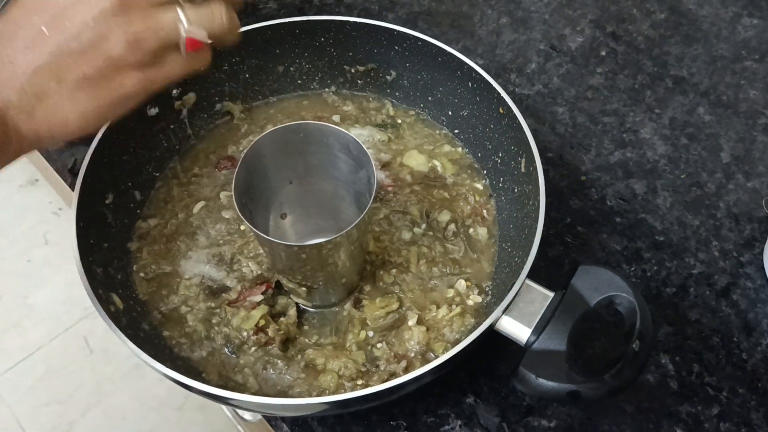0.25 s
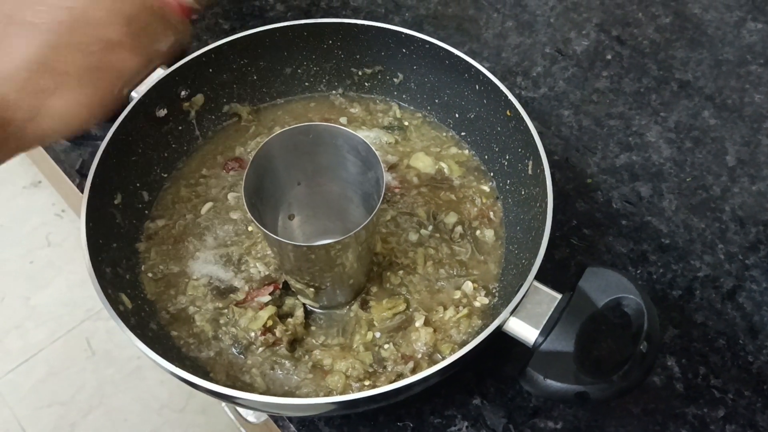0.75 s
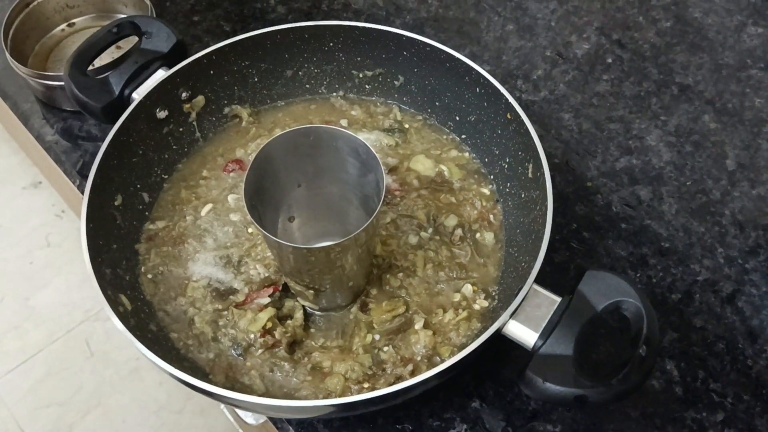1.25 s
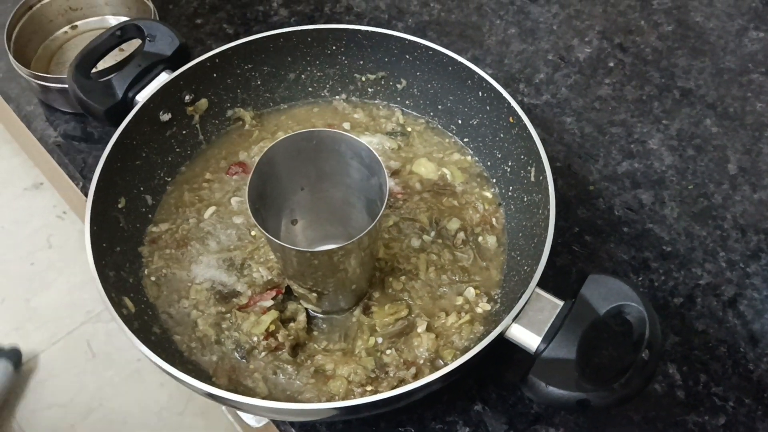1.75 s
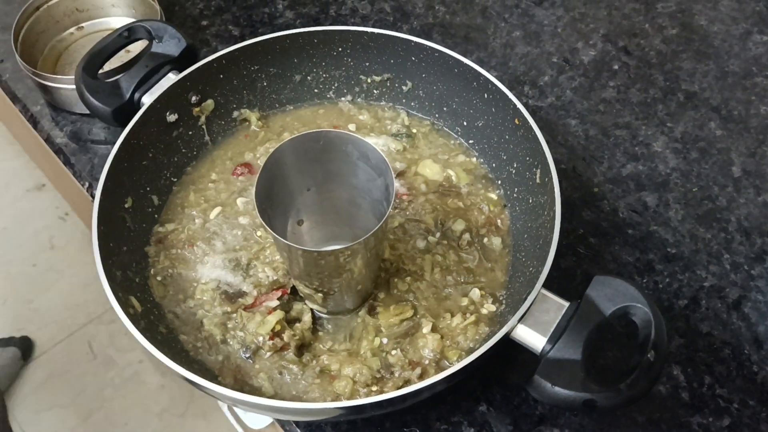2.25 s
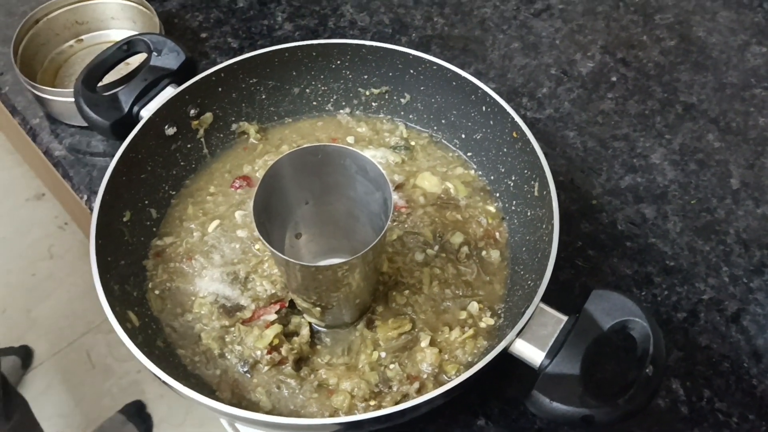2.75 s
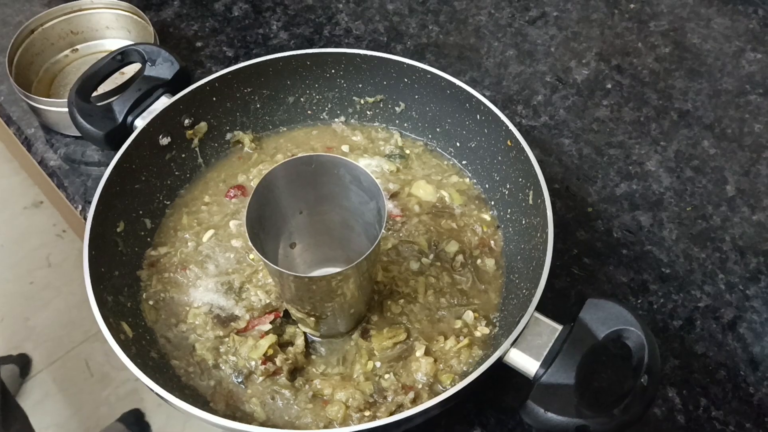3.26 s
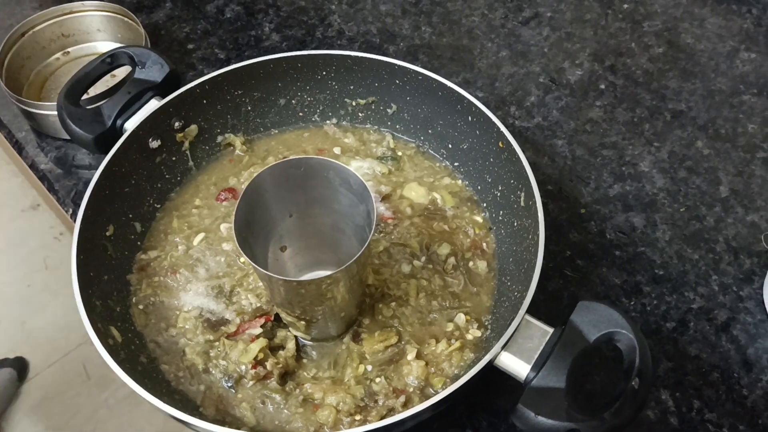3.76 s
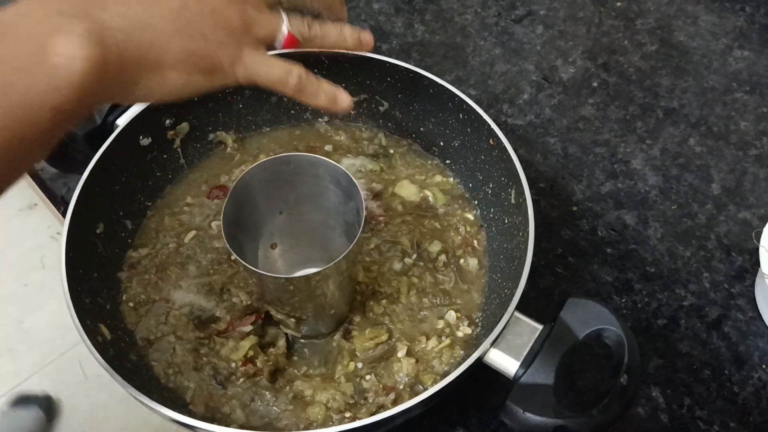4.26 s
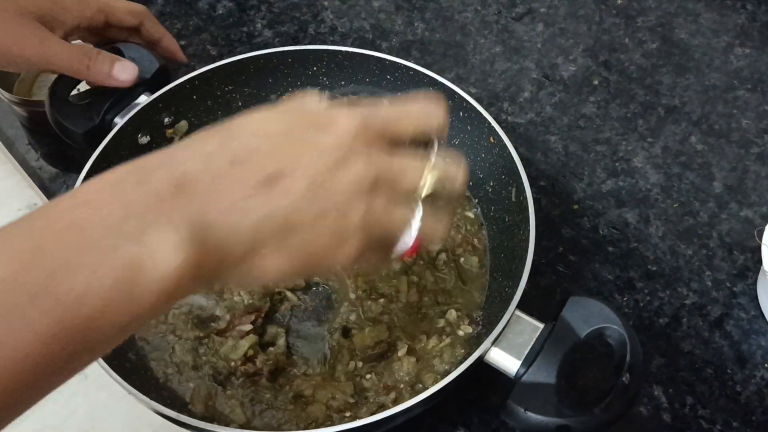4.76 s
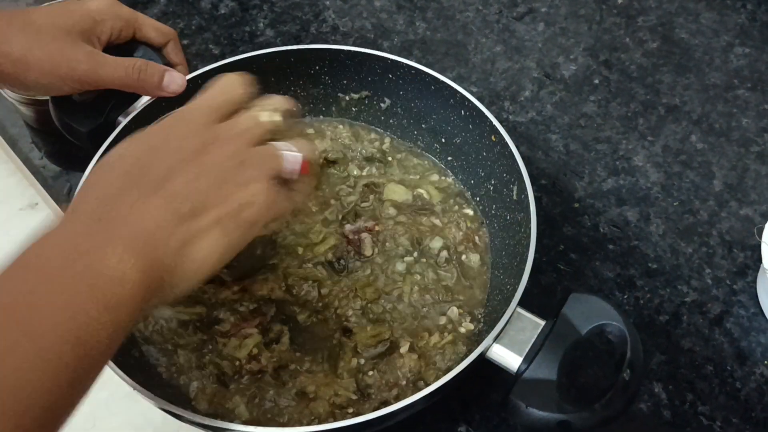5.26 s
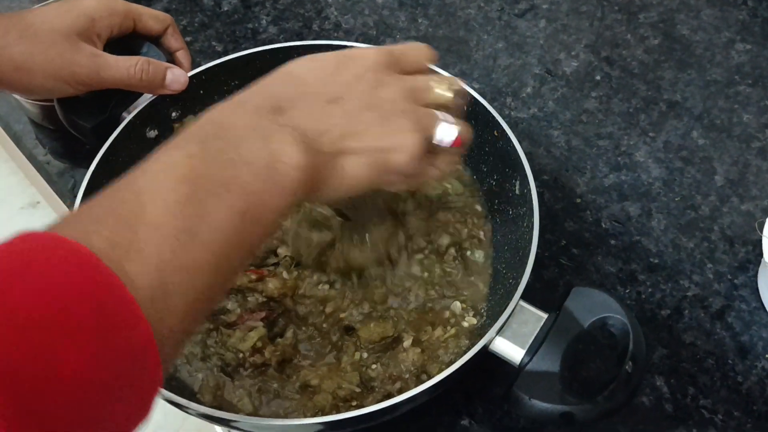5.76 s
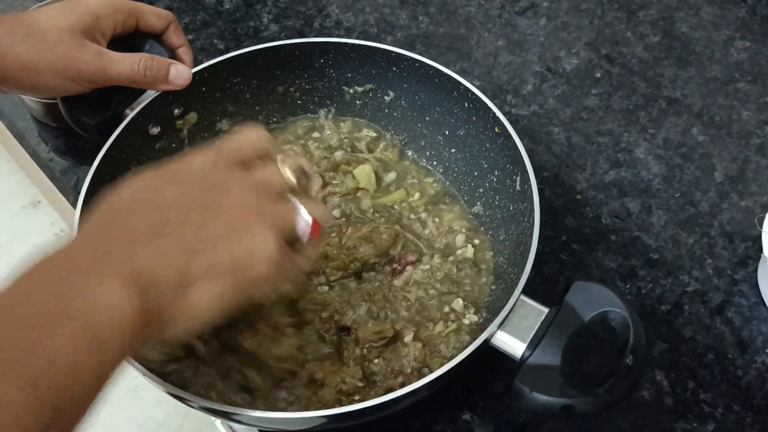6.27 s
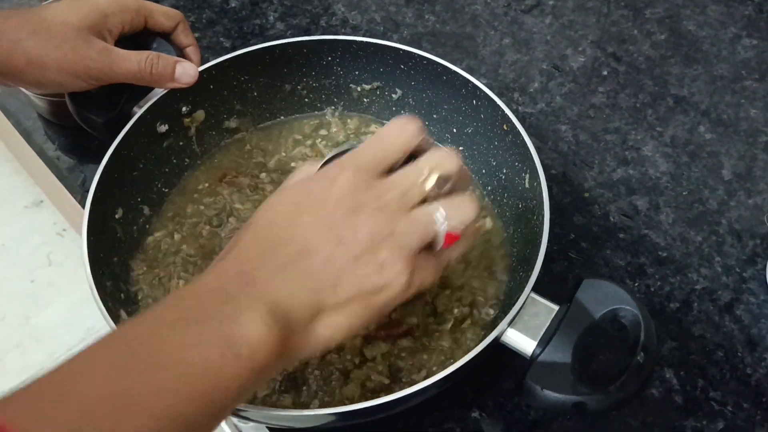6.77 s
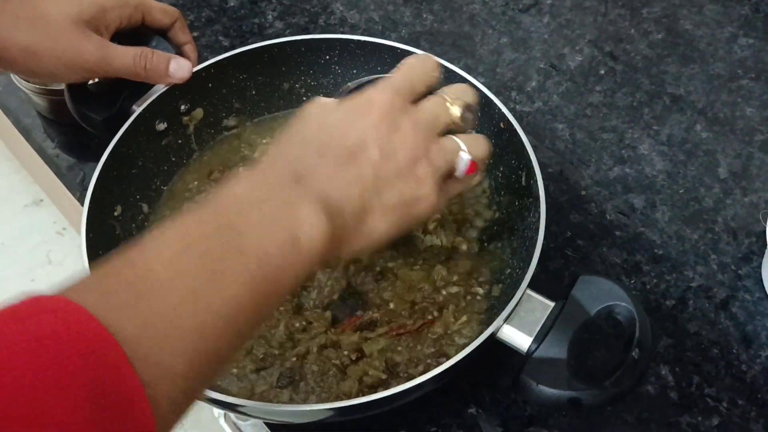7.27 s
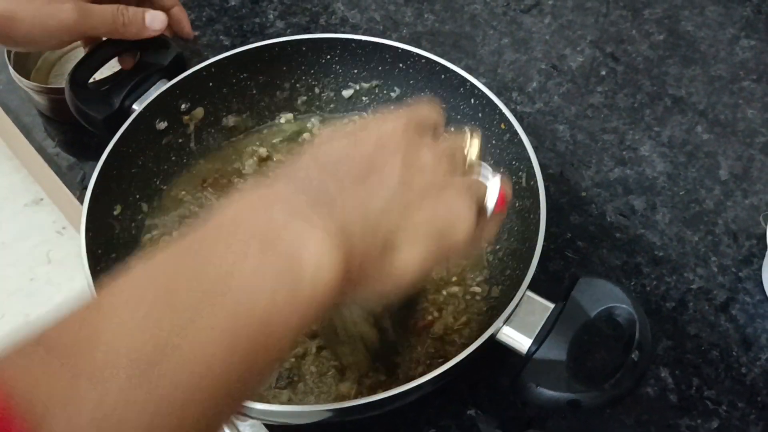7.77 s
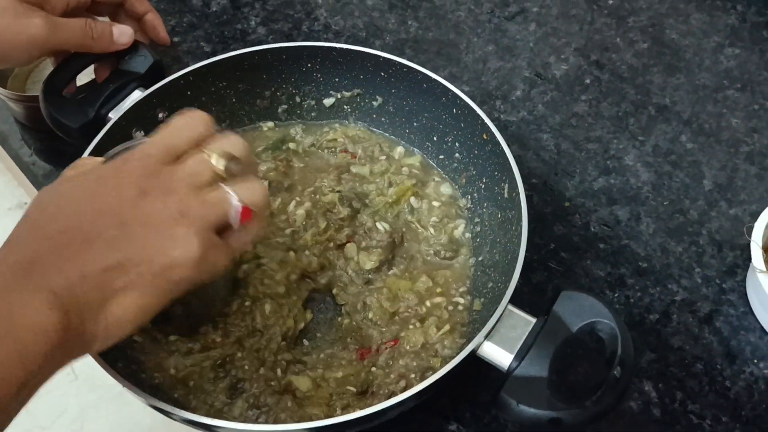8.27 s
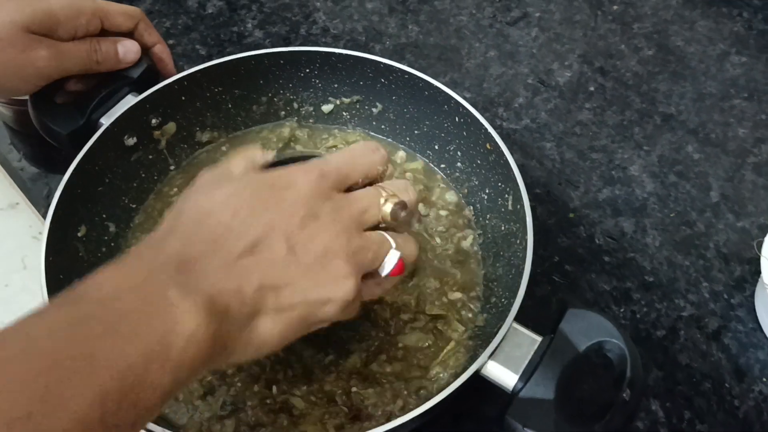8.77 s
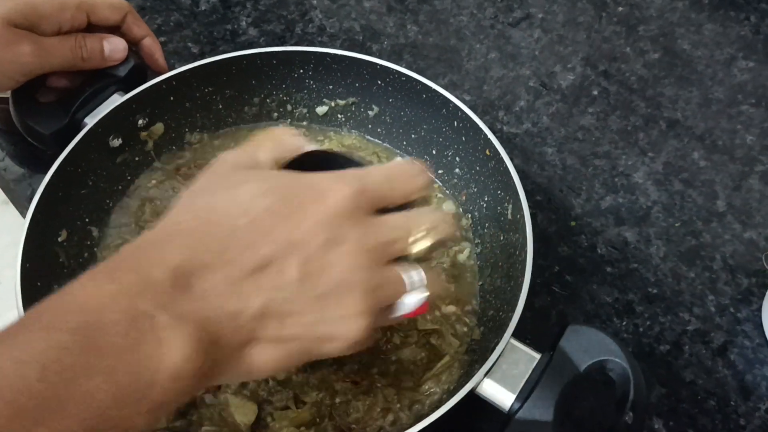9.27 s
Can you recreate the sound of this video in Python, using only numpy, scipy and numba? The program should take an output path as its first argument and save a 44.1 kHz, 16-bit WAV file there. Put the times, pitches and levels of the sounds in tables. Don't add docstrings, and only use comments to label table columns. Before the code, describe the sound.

Indoor kitchen: box clinks, footsteps and a cupboard thud, then wet mashing with hollow metallic pan knocks, ending in a utensil clatter.

```python
import sys
import numpy as np
from scipy import signal
from scipy.fft import rfft, irfft, next_fast_len
from scipy.io import wavfile
from scipy.ndimage import uniform_filter1d
from numba import njit

SR = 44100
rng = np.random.default_rng(int(sys.argv[2]) if len(sys.argv) > 2 else 0)


def store_wav(level_fs):
    pcm = np.round(np.clip(np.atleast_2d(level_fs), -1, 1) * 32767)
    wavfile.write(sys.argv[1], SR, pcm.T.astype(np.int16))


def rack_gain(trim_db):
    fader = np.asarray(trim_db, float)
    return 10 ** (fader / 20)


N = 419832
T = np.arange(N) / SR
HZ = np.maximum(np.fft.rfftfreq(2 * next_fast_len((N + SR) // 2, True), 1 / SR), 1)


def read(table, hz):
    f, value = np.array(table).T
    return np.interp(np.log(hz), np.log(f), value)


def shape(x, gain):
    size = 2 * (len(HZ) - 1)
    return irfft(rfft(x, size) * gain, size)[..., :N]


# f/Hz, level/dB per Hz
COLOUR = [(59, -41), (100, 6.5), (182, -3), (262, 6), (376, 0), (456, 6.5), (564, 10.5), (829, 0.5),
          (983, -5), (2460, -2), (4120, -11), (7020, -9.5), (9670, -17.5), (15100, -13), (16500, -74)]


def band(lo_hz, hi_hz):
    edges = np.sqrt((1 + (lo_hz / HZ) ** 10) * (1 + (HZ / hi_hz) ** 10))
    gain = rack_gain(read(COLOUR, HZ)) / edges
    return gain / np.sqrt(np.mean(gain ** 2))


def ring(x, modes, damp, jitter=0.011):
    out = np.zeros(N)
    for mode_hz, db, t60_s in modes:
        decay = np.log(1000) / (np.clip(t60_s * damp, .005, 1) * SR)
        for f in (mode_hz, mode_hz * (1 + jitter)):
            pole = np.exp(2j * np.pi * f / SR - decay)
            feedback = [1, -2 * pole.real, abs(pole) ** 2]
            out += rack_gain(db) * signal.lfilter([0, pole.imag], feedback, x + 1e-15)
    return out


@njit
def resonate(x, poles, latest):
    out, z = np.empty(len(x)), 0j
    for i in range(len(x)):
        out[i] = z.imag
        z = (z + x[i]) * poles[latest[i]]
    return out


def train(times_s, db, push_s, rough):
    x = np.full(N, 1e-15)
    np.add.at(x, (np.asarray(times_s) * SR).astype(int), rack_gain(db))
    keep = np.exp(-1 / (push_s * SR))
    x = signal.lfilter([np.sqrt(1 - keep ** 2)], [1, -keep], x)
    return x * (1 - rough + rough * rng.standard_normal(N)) if rough else x


def grit(rate_hz, spread_db):
    hits = rng.random(N) < rate_hz / SR
    x = hits * rng.standard_normal(N) * rack_gain(spread_db * rng.exponential(size=N))
    return x / x.std()


def walk(rate_hz):
    k = int(SR / rate_hz)
    held = np.repeat(rng.standard_normal(N // k + 1), k)
    return uniform_filter1d(uniform_filter1d(held, k), k)[:N]


def curve(table):
    s, db = np.transpose(table)
    return np.interp(T, s, db, left=-150, right=-150)


def tone(db, bright, fall_db):
    place = np.array([[0], [.5], [1]])
    return db - 2 * fall_db * np.abs(place - np.clip(bright, 0, 1))


def contacts(table, push_s, rough, fall_db, offsets_db):
    s, db, bright = np.transpose(table)
    levels = tone(db, bright, fall_db) + np.array(offsets_db)[:, None]
    rows = []
    for level in levels:
        click = train(s, level, 1 / SR, 0)
        burst = train(s, level, push_s, 1.0)
        rows.append(np.sqrt(1 - rough) * click + np.sqrt(rough) * burst)
    return np.array(rows)


def treble(rows, edges_hz=((1000, 4000), (4100, 8300), (8300, 16500))):
    return shape(rows, np.array([band(lo, hi) for lo, hi in edges_hz])).sum(axis=0)


def friction(levels, edges_hz, rate_hz, spread_db, flicker_db):
    slips = grit(rate_hz, spread_db) * rack_gain(flicker_db * walk(40))
    return sum(shape(slips * level, band(lo, hi)) for level, (lo, hi) in zip(levels, edges_hz))


def swells(s, length_s, db, rise):
    out = np.full((len(db), N), 1e-9)
    for start, span, gain in zip(s, length_s, rack_gain(db).T):
        part = slice(int(start * SR), int((start + span) * SR))
        u = (T[part] - start) / span
        out[:, part] += np.outer(gain, np.clip(np.minimum(u / rise, (1 - u) / (1 - rise)), 0, 1))
    return out


def pops(table):
    out, t = np.zeros(N), T[:SR // 8]
    for s, db, f, t60_s in table:
        pair = np.sin(2 * np.pi * f * t) + np.sin(2 * np.pi * f * 1.017 * t)
        fade = rack_gain(db - 60 * t / max(0.33 * t60_s, .005))
        out[int(s * SR):][:len(t)] += 1.8 * fade * pair
    return out


# f/Hz, correlation/1
ALIKE = [(30, 0.24), (80, 1), (200, 0.77), (500, 0.62), (1000, 0.12), (3000, -0.077), (16000, 0.056)]


def ports(a, b):
    c = np.clip(read(ALIKE, HZ), -.99, .99)
    mid, side = shape(a, np.sqrt((1 + c) / 2)), shape(b, np.sqrt((1 - c) / 2))
    return np.array([mid + side, mid - side])


# f/Hz, level/dB per Hz
AIR = [(12, -44), (20, -12), (37, -25), (55, -22), (78, -2), (108, 7.5), (184, -8.5), (404, -11.5),
       (520, -18), (620, -12.5), (760, -20.5), (2890, -19), (4280, -28.5), (6530, -23.5), (9410, -36),
       (12500, -27), (15200, -36), (16500, -66)]
AIR_DB = -56


def air():
    x = shape(ports(*rng.standard_normal((2, N))), rack_gain(read(AIR, HZ)))
    bass = shape(x, 1 / (1 + (HZ / 300) ** 4))
    x = bass * rack_gain(2.5 * walk(5)) + (x - bass) * rack_gain(1.5 * walk(4))
    return x * rack_gain(AIR_DB) / x.std()


# f/Hz, t60/s
ROOM_T60 = [(100, 0.51), (500, 0.45), (2000, 0.31), (6000, 0.26), (14000, 0.19)]
ROOM_DB, LAG_S = 10.5, 0.000321
DRIER_DB_OCT, DRIER_HZ = 3, 2700


def room():
    hz, s, wide = signal.stft(rng.standard_normal((2, SR)), SR, nperseg=256)
    fade = np.exp(-np.log(1000) * s / read(ROOM_T60, np.maximum(hz, 1))[:, None])
    fade /= np.sqrt(np.sum(fade ** 2, axis=1, keepdims=True) * SR * s[1])
    tails = signal.istft(wide * fade, SR, nperseg=256)[1]
    tails = tails * (1 - np.exp(-np.arange(SR + 60) / SR / .002))
    tails = rfft(ports(*tails), 2 * (len(HZ) - 1))
    lag = np.exp(-2j * np.pi * HZ * LAG_S * rng.uniform(.85, 1.25))
    wet = rack_gain(ROOM_DB - DRIER_DB_OCT * np.log2(np.maximum(HZ / DRIER_HZ, 1)))
    return (np.array([np.ones(len(HZ)), lag]) + wet * tails) / np.sqrt(1 + wet ** 2)


# t/s, peak/dB, f/Hz, t60/s
TICKS = [
    (.132, -49.5, 700, .008),
    (.325, -59.5, 1660, .12),
    (.325, -63, 2270, .12),
    (.468, -56, 2300, 0.13),
    (.484, -56, 2270, .12),
    (.62, -53, 500, 0.025),
    (7.918, -35.5, 480, .008),
]


def phone_case():
    return pops(TICKS)


# t/s, peak/dB, brightness/0-1
CLINKS = [
    (.2229, -55, .55),
    (0.2457, -31, 0.93),
    (0.4753, -28, .98),
    (0.4802, -14, 0.81),
    (.636, -38, 0.78),
    (0.6843, -33.5, 0.72),
    (0.697, -28, 1),
    (0.885, -24.5, 0.73),
    (1.0624, -54, 1),
]
# f/Hz, level/dB, t60/s
BOX = [(3230, -13, 0.067), (5200, -22, 0.085), (5860, -2, 0.14), (6100, -1, 0.4), (6200, 6, 0.14),
       (7000, -7, 0.31), (8600, -24, 0.39), (8900, -30, 0.45), (10600, 0.5, 0.18), (11340, -2, 0.15),
       (13510, -27, 0.24)]


def box():
    s, db, bright = np.transpose(CLINKS)
    _, mid, high = tone(db, bright, 25.6)
    low_modes = [m for m in BOX if m[0] < 8000]
    high_modes = [m for m in BOX if m[0] > 8000]
    low_ring = ring(train(s, mid - 13, .00003, 0), low_modes, 0.47, jitter=0.0086)
    high_ring = ring(train(s, high - 14, .00003, 0), high_modes, 0.35, jitter=0.0041)
    fingers = contacts(CLINKS, 0.0026, .99, 7.0, [-3, 7, 10])
    return low_ring + high_ring + treble(fingers, [(2600, 3500), (5000, 8300), (8300, 16500)])


# t/s, peak/dB, brightness/0-1
SLAPS = [(1.1246, -36, 0), (1.1715, -25.5, 0), (1.2147, -34, .02), (1.233, -9.5, 0.04), (1.4715, -13, 0),
         (1.776, -20, 0), (1.9133, -13.5, 0.19), (1.9454, -10, 0.31), (2.077, -24, 0.04),
         (2.1046, -14, 0.24), (2.1505, -15, 0.24), (2.3535, -17, 0.31), (2.4872, -25, 0.03),
         (2.5153, -21.5, 0), (2.5419, -13.5, 0), (2.999, -15, 0.28), (3.0489, -8.5, 0.02),
         (3.4291, -14, 0.36)]


def slaps():
    return treble(contacts(SLAPS, .011, 0.82, 10.3, [15, 16, 14]))


# t of full speed/s, level/dB, fade/dB per s, brightness/0-1
DRAGS = [(1.25, -23, 176, 0.14), (1.3, -27.5, 209, 0.12), (1.328, -28.5, 226.5, 0.12), (1.39, -45, 120, .1),
         (2.155, -35.5, 203, 0.17), (1.485, -20, 257, 0.08), (1.55, -31, 195, 0.1), (1.799, -32.5, 89, 0),
         (1.96, -44, 200, 0.5), (2.109, -33, 166, 0.17), (2.359, -40, 136, 0.24), (2.565, -33, 78, 0.28),
         (2.65, -43, 100, 0.28), (2.732, -33.5, 61, 0.11), (3.063, -24.5, 126, 0.15),
         (3.339, -46, 104, 0.24), (3.43, -47, 102, 0.16)]
DRAG_RISE_DB_S, DRAG_FALL_DB = 565, 8
DRAG_BASS_DB, DRAG_BODY_DB = -12, -15.5


def drags():
    s, db, fade, bright = np.transpose(DRAGS)
    late = T - s[:, None]
    speed = rack_gain(np.minimum(DRAG_RISE_DB_S * late, -fade[:, None] * late))
    levels = np.vstack([db + DRAG_BASS_DB, db + DRAG_BODY_DB, tone(db, bright, DRAG_FALL_DB)])
    edges_hz = [(111, 406), (720, 990), (1070, 3250), (3460, 8300), (8460, 16600)]
    return friction(rack_gain(levels) @ speed, edges_hz, 1800, 2.7, 5.0)


# t/s, peak/dB
DOOR = [
    (3.051, -6.5),
    (3.083, -14.5),
]
# f/Hz, level/dB, t60/s
DOOR_MODES = [(103.6, -14, 1), (162, 6, 0.34), (201, 1, 0.84), (260, 2.5, 0.19), (316, -13, 0.55),
              (538, -22, 0.2), (624, -16, 0.2), (668, -26, 0.89)]


def door():
    s, db = np.transpose(DOOR)
    panel = ring(train(s, db - 28.5, 0.00023, 0.089), DOOR_MODES, 0.31)
    return panel + shape(train(s, db + 11.5, 0.0037, 1.0), band(200, 2200))


# f/Hz, width/Hz, level/dB
TUMBLER = [(1830, 110, -1), (2670, 99, 1), (4890, 40, -1), (4600, 60, -5), (6770, 43, -6), (7980, 90, 4.5),
           (8400, 34, -6), (11400, 57, 0.5), (13000, 84, 2), (14100, 32, -13)]
# t/s, level/dB
SING = [
    (4.735, -53),
    (4.775, -50.5),
    (4.93, -95),
]
# t/s, peak/dB
TAPS = [
    (5.3836, -42),
    (5.88, -45),
    (5.896, -41),
    (6.1157, -48),
    (8.305, -35),
]


def tumbler_wall():
    wall = [(hz, db, np.log(1000) / (np.pi * width_hz)) for hz, width_hz, db in TUMBLER]
    s, db = np.transpose(TAPS)
    slide = grit(900, 2.0) * rack_gain(curve(SING) - 24)
    return ring(slide + train(s, db - 16, .0002, 1), wall, 1.2, jitter=.003)


# f/Hz, level/dB, t60/s
CLATTER = [(1740, -9, 5.0), (2260, -2, 5.0), (2514, 5.5, 5.0), (2580, 9.5, 5.0), (2657, 6, 5.0),
           (3060, 2.5, 1.7), (3300, -7, 1.7)]
# f/Hz, level/dB, t60/s
CLATTER_TOP = [(6100, -5, .03), (6400, 3, 0.027), (6960, -1.5, 0.024)]
# t/s, peak/dB
CLATTER_HITS = [
    (9.0987, -1.5),
    (9.1075, -3.5),
    (9.1851, -7),
    (9.199, -13.5),
    (9.221, -17),
    (9.247, -7),
    (9.2878, -27),
    (9.319, -31),
]
# t/s, level/dB
SLIDE = [
    (9.09, -117),
    (9.0985, -10),
    (9.115, -20.5),
    (9.28, -27),
    (9.46, -54),
]
# f/Hz, level/dB per Hz
SLIDE_COLOUR = [(350, -53), (600, 0.5), (661, 1), (812, -17), (1570, -11), (1730, -0.5), (1980, -8.5),
                (2500, -2.5), (3350, -9), (4580, -20.5), (5120, -44), (5800, -19), (7200, -21.5),
                (8270, -52), (16000, -83)]


def utensil():
    s, db = np.transpose(CLATTER_HITS)
    rattle = grit(2500, 2.5) * rack_gain(curve(SLIDE))
    push = train(s, db - 22.5, .0001, 0.59) + rattle * rack_gain(-42.5)
    rings = ring(push, [(hz, d, .3) for hz, d, _ in CLATTER], 0.18)
    rings += ring(train(s[:2], db[:2] - 19.0, .00004, 0.81), CLATTER_TOP, 0.59)
    colour = rack_gain(read(SLIDE_COLOUR, HZ))
    return rings + shape(rattle, colour / np.sqrt(np.mean(colour ** 2)))


# t/s, peak/dB, f/Hz, t60/s
POPS = [(4.24, -43, 2900, .02), (4.26, -46, 3240, 0.02), (8.757, -26, 3230, 0.053),
        (8.76, -29, 3700, 0.047), (8.57, -44, 2270, 0.14), (7.5, -35, 1790, 0.13), (5.9, -40, 3900, 0.12),
        (5.387, -41, 6150, 0.16), (5.387, -39.5, 6900, 0.16), (5.682, -22.5, 6900, .06),
        (7.547, -25.5, 4650, 0.046), (7.555, -30, 2090, 0.042), (5.82, -36.5, 2260, 0.09),
        (7.26, -45, 2500, .1), (7.77, -45, 3320, 0.063), (8.316, -27.5, 2550, 0.094),
        (.247, -60, 2900, 0.12), (.481, -52, 3100, 0.16), (7.195, -43.5, 1050, 0.04),
        (8.893, -34.5, 1104, 0.078)]


def bubbles():
    return pops(POPS)


# t/s, peak/dB, brightness/0-1
BOUNCES = [(0.57, -38, 0.8), (1.2417, -0.5, 0), (1.2552, -11, 0), (1.9471, -7, 0.64), (2.5592, -6, 0.5),
           (2.883, -29, 0.1), (3.441, -15, 0.37), (3.07, 2.5, 0.15), (8.327, -16, 0.5), (5.695, -18, .8),
           (8.765, -9.5, 0.74), (5.684, -8.5, 1), (8.756, -8, 0.35), (7.556, -8, 0.9), (8.305, -20, 0.95)]
SMACK_S, SMACK_ROUGH = .007, .78


def bounces():
    return treble(contacts(BOUNCES, SMACK_S, SMACK_ROUGH, 11.3, [5, 6, 5]))


# t/s, peak/dB, brightness/0-1
SMACKS = [(3.782, -27, 0.26), (3.9383, -29.5, 0.98), (4.985, -29, 1), (4.9978, -29.5, 0.32),
          (5.1004, -24.5, 0.66), (5.2606, -35.5, 1.), (5.3835, -27.5, 0.64), (5.68, -7, 0.82),
          (5.9752, -24, 0.7), (6.2214, -15, 1.), (6.687, -29, 0.82), (6.705, -23.5, 0.8),
          (7.132, -23.5, 0.67), (7.206, -16, 0.73), (7.414, -32, 0.6), (7.4366, -29, 0.3),
          (7.545, -4.5, 0.7), (7.7707, -34.5, 0.8), (7.8732, -21, 0.86), (8.0012, -26, 0.25),
          (8.3161, -8.5, 0.62), (8.7454, -6, 0.47), (8.891, -15, 0.73), (9.0992, -2.5, 0.01),
          (9.4744, -31.5, 1)]


def smacks():
    return treble(contacts(SMACKS, SMACK_S, SMACK_ROUGH, 10.96, [17, 11, 11]))


# t/s, peak/dB
SCUFFS = [
    (6.415, -29.5),
    (6.5596, -42),
    (6.953, -30.5),
    (6.9778, -26),
    (7.308, -30),
    (7.679, -38),
    (7.8796, -30),
    (8.3178, -26),
    (9.4748, -30.5),
]


def scuffs():
    return treble(contacts([(s, db, 0) for s, db in SCUFFS], 0.0065, 0.49, 11.6, [17, 17, 11]))


# t/s, length/s, level/dB, brightness/0-1
STROKES = [(0.92, 0.22, -61, 0.56), (4.046, 0.23, -58, 0.57), (4.233, 0.074, -49, 0.9),
           (4.492, 0.33, -52.5, 0.66), (4.682, 0.2, -52.5, 0.13), (4.946, 0.13, -49.5, 0.9),
           (5.042, 0.16, -46, 0.09), (5.256, 0.045, -62, 0.5), (5.381, 0.12, -56.5, 0.2),
           (5.482, 0.1, -54.5, 0.56), (5.768, 0.12, -38.5, 0.09), (5.97, 0.19, -61, 0.23),
           (6.109, 0.17, -46, 0), (6.365, 0.24, -44, 0.02), (6.538, 0.089, -50, 0.02),
           (6.662, 0.18, -44.5, 0.65), (6.817, 0.35, -51.5, 0), (7.013, 0.12, -53.5, 0.8),
           (7.182, 0.045, -46.5, 0.17), (7.35, 0.33, -52.5, 0.8), (7.641, 0.12, -47.5, 0.3),
           (7.859, 0.16, -50, 0.4), (8.031, 0.13, -55, 0.1), (8.11, 0.076, -44, 0.44),
           (8.473, 0.13, -42.5, 0), (8.839, 0.14, -45.5, 0.24), (9.102, 0.25, -43, 0.47),
           (9.472, 0.035, -47, 0.06)]


def flecks():
    s, length_s, db, _ = np.transpose(STROKES)
    effort = swells(s, np.minimum(1.45 * length_s, T[-1] - s), db[None], 0.36)[0]
    out, u = np.zeros(N + 512), np.arange(512)
    for place, pitch, cycles, size in rng.random((1500, 4)):
        i = int(place * N)
        hz = np.clip(3000 * 2 ** (3 * (pitch - .5)), 500, 12000)
        turns, life = u * hz / SR, 2 + 4 * cycles
        glide = 1 + .4 * turns / life / 2
        chirp = np.sin(2 * np.pi * turns * glide) * np.exp(-3 * turns / life)
        out[i:i + 512] += effort[i] * rack_gain(-7 - 12 * size) * chirp
    return out[:N]


# t/s, length/s, level/dB
GRINDS = [
    (6.53, 0.13, -27.5),
    (7.297, 0.08, -37),
    (7.424, 0.05, -41),
    (7.997, 0.11, -29.5),
    (8.51, .1, -30),
    (5.8, 0.056, -41),
    (6.199, 0.025, -48),
    (9.267, 0.058, -25.5),
]
RUB_DB, RUB_LOSS_DB, WET_FALL_DB = 7, 22.5, 7.5


def mashing():
    s, length_s, db, bright = np.transpose(STROKES)
    rub_db = db + RUB_DB - RUB_LOSS_DB * bright
    rub, *wet = swells(s, length_s, np.vstack([rub_db, tone(db, bright, WET_FALL_DB)]), 0.25)
    s, length_s, db = np.transpose(GRINDS)
    rub = rub + swells(s, length_s, db[None], 0.053)[0]
    return friction(wet, [(1000, 3500), (3500, 8000), (8000, 16500)], 2500, 3.0, 5.5), rub


# t/s, peak/dB, ring centre/Hz, low modes/dB
KNOCKS = [(4.63, -47, 683, 4), (4.817, -28.5, 260, 4), (5.065, -38, 624, -2), (5.109, -21.5, 740, 8),
          (5.265, -33.5, 827.6, 3), (5.401, -45, 598, -1), (5.447, -38.5, 566, 1), (5.679, -25.5, 650, -7),
          (5.706, -33, 706, -6), (5.788, -16, 604, 8), (5.81, -13.5, 621, 2), (5.942, -53, 654, 2),
          (6.148, -23.5, 695, -9), (6.203, -37, 614, -5), (6.384, -24.5, 693, 10), (6.408, -20.5, 672, -1),
          (6.435, -19.5, 693, -19), (6.559, -11, 685, -10), (6.58, -15, 647, -7), (6.816, -36, 668, 1),
          (6.904, -23, 634, 10), (6.936, -13, 686, 8), (6.976, -17, 668, 2), (7.0, -17.5, 648, 9),
          (7.085, -30.5, 598, -11), (7.308, -7, 672, 14.5), (7.332, -16, 661, 13), (7.686, -18, 463, 3),
          (7.887, -41, 647, -9), (8.005, -17.5, 595, 7), (8.029, -18.5, 580, 4), (8.486, -20, 430, -3),
          (8.518, -24, 511, -15), (8.544, -24, 494, -10), (8.742, -25.5, 625, 0), (8.795, -34, 584, -6),
          (8.892, -16, 654, -18), (8.919, -17, 570, -3.5), (9.102, -19, 640, -20), (9.18, -21.5, 668, 7),
          (9.242, -29, 634, -2), (9.266, -9.5, 538, -10), (9.281, -8, 567, -6), (9.291, -7, 559, -6),
          (9.318, -20, 573, -8)]
# f/Hz, level/dB, t60/s
PAN = [(198, 4, 0.092), (320, -8.5, 0.58), (407.8, -12, 0.42), (487.5, -16.5, 0.26), (549, -11, 0.16),
       (588.4, -9, 0.33), (640.7, -2, 0.33), (691, -7.5, 0.22), (772, -15.5, 0.093), (872, -8, 0.2)]
# t/s, ring time share/1, two lowest modes/dB, crack/dB
PRESSES = [(0, .8, 0, 0), (4.8, 0.38, 1, -6), (5.05, 0.5, 4, 0), (5.25, .7, -1, -1.5), (5.67, .8, -12, -1),
           (5.78, 0.38, -12, -0.5), (6.14, 0.33, -6, -4), (6.38, 0.79, -5, -3), (6.55, 0.95, 7, -3.5),
           (6.81, 0.82, -4, -5.5), (6.97, .6, -8, -5), (7.3, 0.65, -5, -3.5), (7.68, 0.54, 0, -6.5),
           (7.88, .7, 0, -5), (8.0, 0.79, -1.5, -4), (8.48, 0.57, -10, -14), (8.74, .5, -6, -3),
           (8.89, 0.49, -2, -5), (9.1, 0.61, 0, -4), (9.26, 0.59, 4, -2)]
LOAD_HZ, LOAD_SLOPE, LOW_HZ = 640, 0.4, 430
SLOSH_HZ, SLOSH_DEPTH = 7, 0.019
CRACK_DB, CRACK_SLOPE = 6.5, 0.63
THUMP_HZ, THUMP_DB, THUMP_T60_S, THUMP_PUSH_S = 101, -53.5, 0.37, 0.00054


def pan(rub):
    s, db, hz, low_db = np.transpose(KNOCKS)
    latest = np.clip(np.searchsorted(s, T + .002) - 1, 0, None)
    slips = grit(600, 2.0) * rub * rack_gain(-28) * (T > s[0] - .02)
    presses = np.transpose(PRESSES)
    _, share, deep_db, crack_db = presses[:, np.searchsorted(presses[0], s) - 1]
    steps = np.arange(0, N, 128)
    now = latest[steps]
    scatter_db = 2.0 * rng.standard_normal((len(s), len(PAN)))
    out = 0
    for k, (mode_hz, mode_db, t60_s) in enumerate(PAN):
        low = mode_hz < LOW_HZ
        octaves = np.abs(np.log2(mode_hz / hz))
        place_db = low * low_db + (k < 2) * deep_db
        knocks = train(s, db - 18.5 - 21 * octaves + place_db + scatter_db[:, k], 0.000088, 0.23)
        push = rack_gain(mode_db) * (knocks + slips * rack_gain(-18 * octaves + place_db)[latest])
        rate = np.log(1000) / (np.clip(share, .1, 2) * t60_s)
        for twin in (1, 1.006):
            loaded_hz = twin * mode_hz * (hz / LOAD_HZ) ** (LOAD_SLOPE * (not low))
            slosh_hz = SLOSH_HZ * twin ** 20 * (1 + k / 20)
            slosh = 1 + SLOSH_DEPTH * (not low) * np.sin(2 * np.pi * slosh_hz * T[steps] + 2 * k)
            poles = np.exp((2j * np.pi * loaded_hz[now] * slosh - rate[now]) / SR)
            out = out + resonate(push, poles, np.arange(N) // 128)
    out = shape(out, 1 / np.sqrt(1 + (260 / HZ) ** 6))
    thump = train(s, db + THUMP_DB, THUMP_PUSH_S, 0)
    out += ring(thump, [(THUMP_HZ, 0, THUMP_T60_S)], 1.0, jitter=0.052)
    crack = train(s, CRACK_SLOPE * db + CRACK_DB + crack_db, 0.0007, 0.6)
    return out + shape(crack, band(910, 1640))


PAN_NEAR_DB, PAN_FAR_DB = -8.5, -2
MOVE_S = .12


def scene():
    squelch, rub = mashing()
    vessel = shape(pan(rub), 1 / np.sqrt(1 + (80 / HZ) ** 8))
    dry = box() + slaps() + drags() + door() + tumbler_wall() + utensil() + bubbles()
    dry += bounces() + smacks() + scuffs() + squelch + rack_gain(PAN_FAR_DB) * vessel
    dry = shape(dry, 1 / np.sqrt(1 + (88 / HZ) ** 14))
    dry += flecks()
    close = rack_gain(PAN_NEAR_DB) * np.array([vessel, np.roll(vessel, int(LAG_S * SR))])
    out = air() + close + phone_case()
    turn = T / MOVE_S / 3
    for k in range(3):
        away = np.clip(3 * np.abs((turn + k / 3) % 1 - .5), 0, 1)
        out = out + shape(dry * np.cos(np.pi / 2 * away), room())
    return out


def low_pass(x):
    return signal.sosfilt(signal.butter(12, 16960, fs=SR, output="sos"), x)


# f/Hz, level/dB
LEFT_RIGHT = [(60, -2), (110, -1.5), (200, -3.5), (380, 1), (700, -1), (1290, -2), (2380, -6), (4400, -5.5),
              (8120, -5), (11000, 17), (15000, 13)]
TOP_HZ = 15950


def record(dry):
    tilt_db = read(LEFT_RIGHT, HZ) / 2
    left, right = rack_gain(tilt_db), rack_gain(-tilt_db)
    mix = np.tanh(shape(dry, np.array([left, right]) * 2 / (left + right)))
    mix = shape(mix, np.exp(-np.minimum(HZ / TOP_HZ, 2) ** 60))
    return low_pass(mix)


dry = scene()
out = record(dry)
store_wav(out)
```